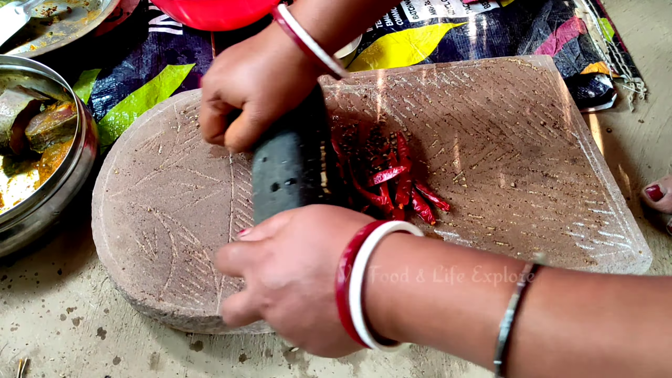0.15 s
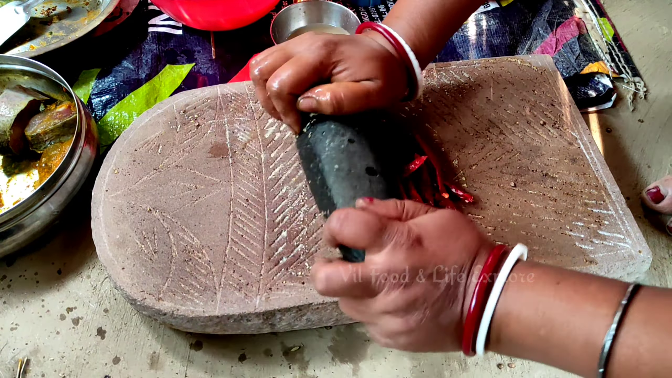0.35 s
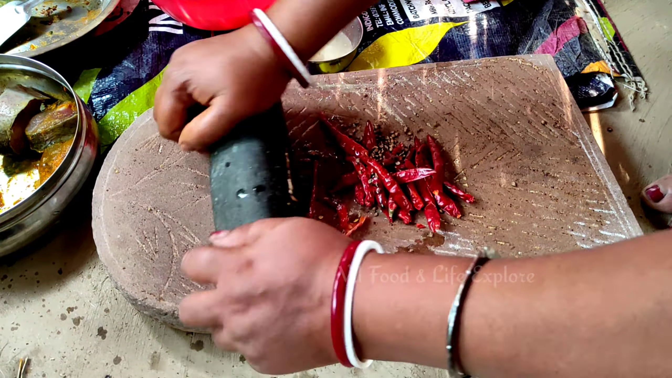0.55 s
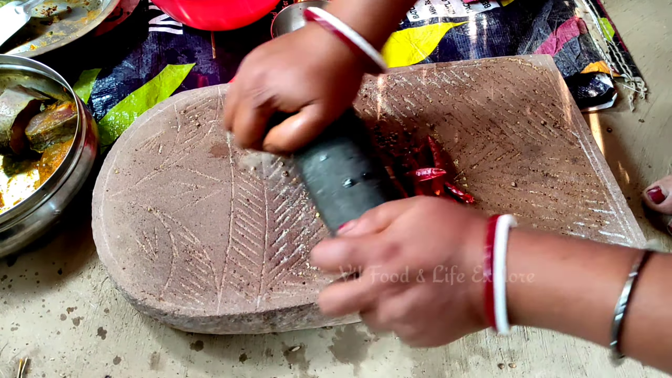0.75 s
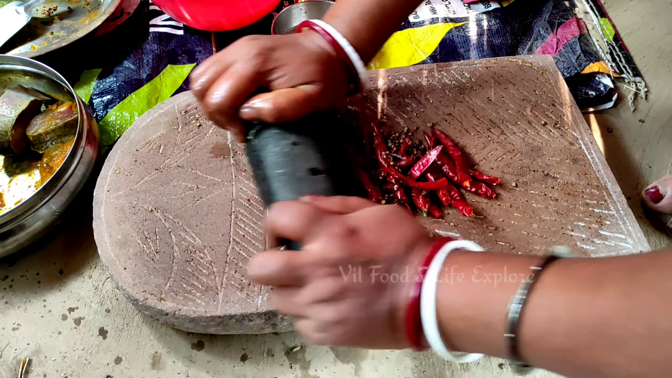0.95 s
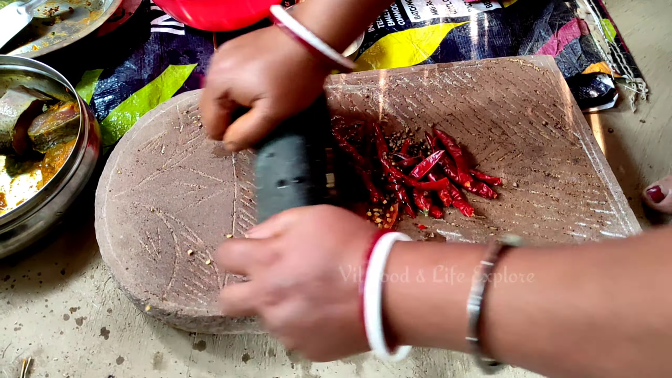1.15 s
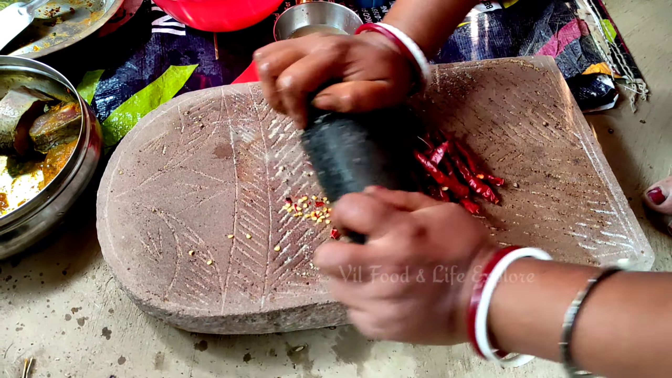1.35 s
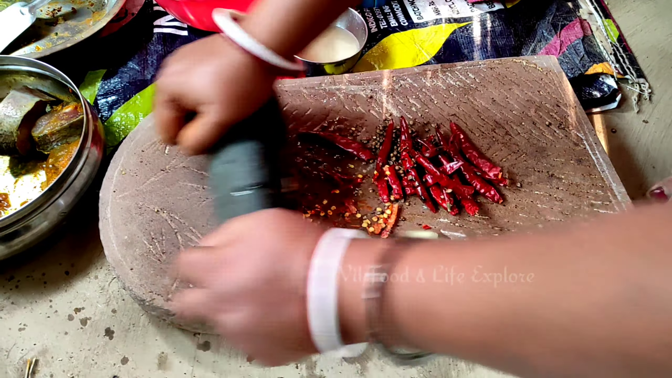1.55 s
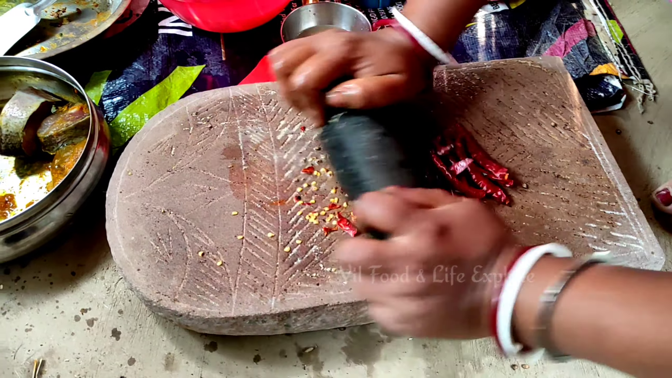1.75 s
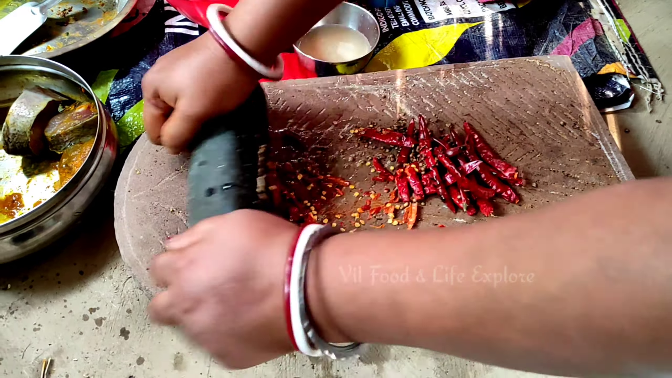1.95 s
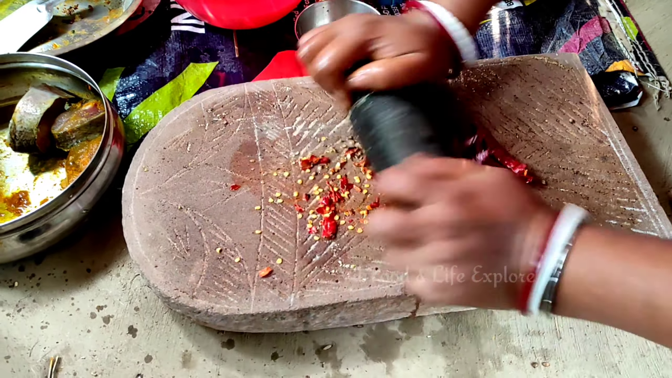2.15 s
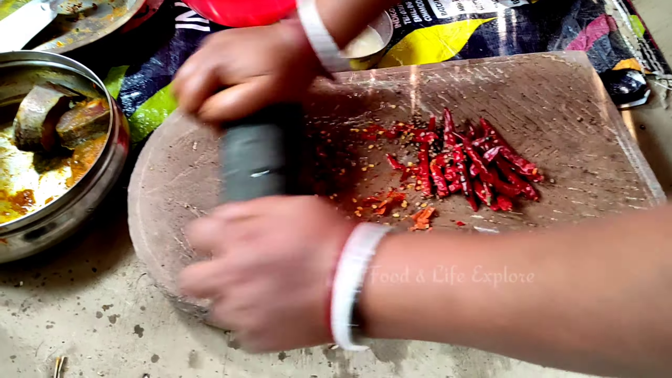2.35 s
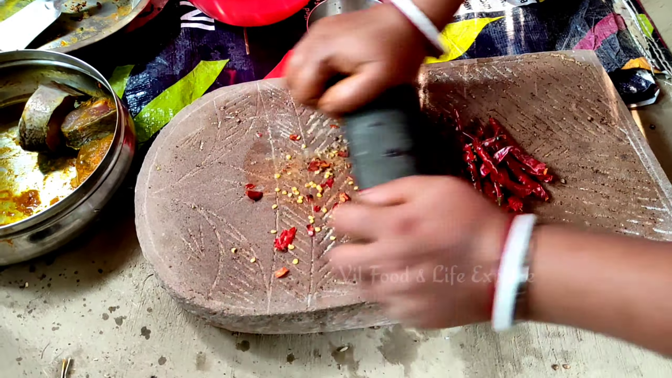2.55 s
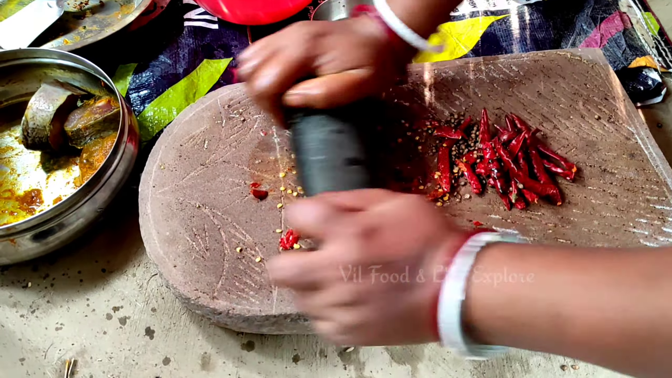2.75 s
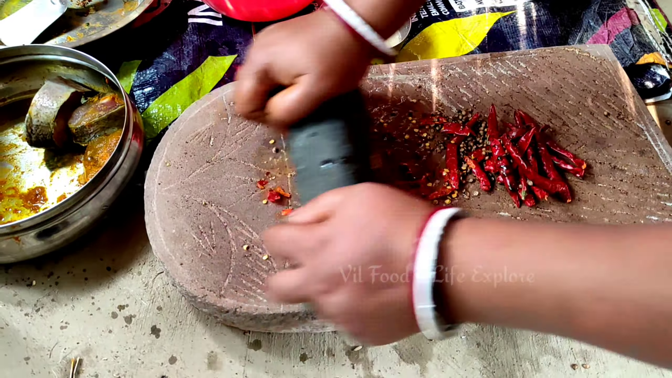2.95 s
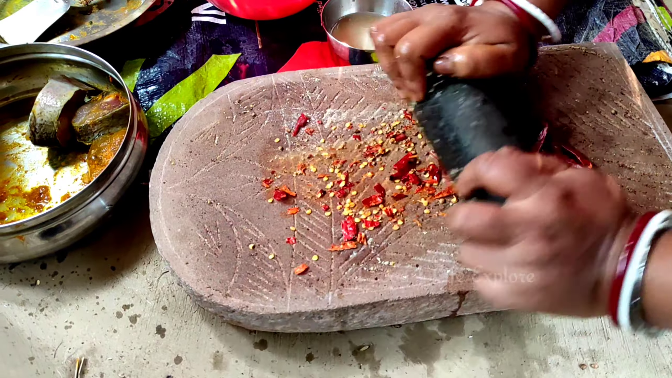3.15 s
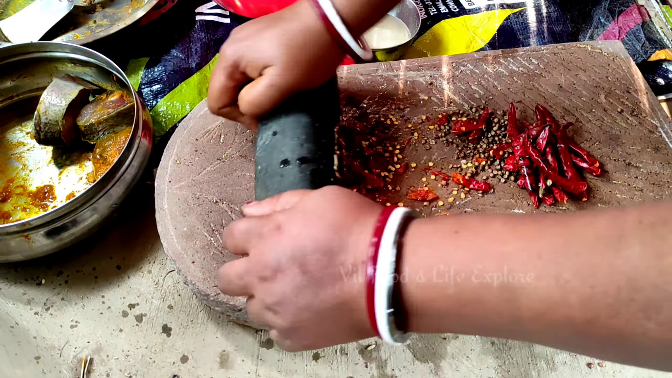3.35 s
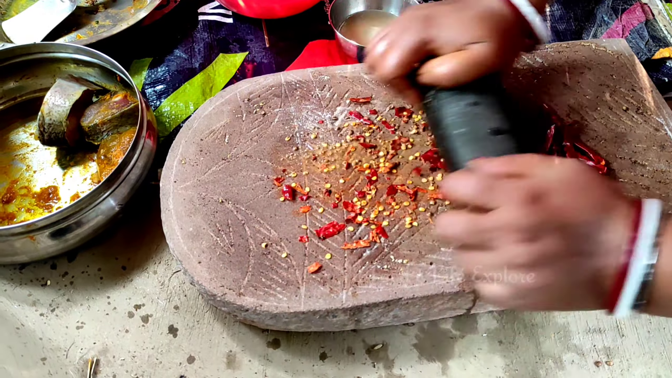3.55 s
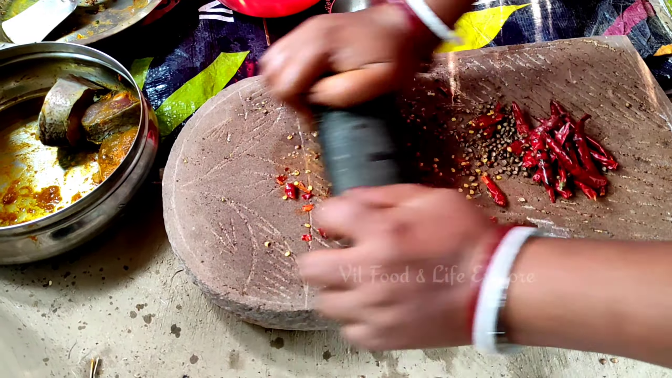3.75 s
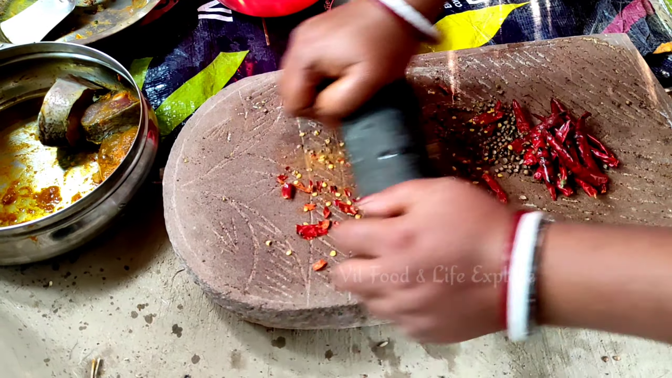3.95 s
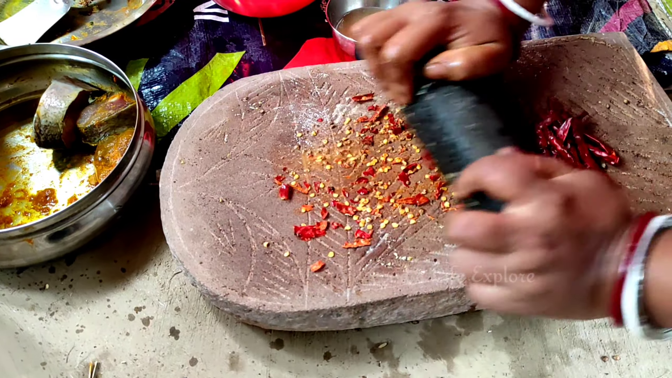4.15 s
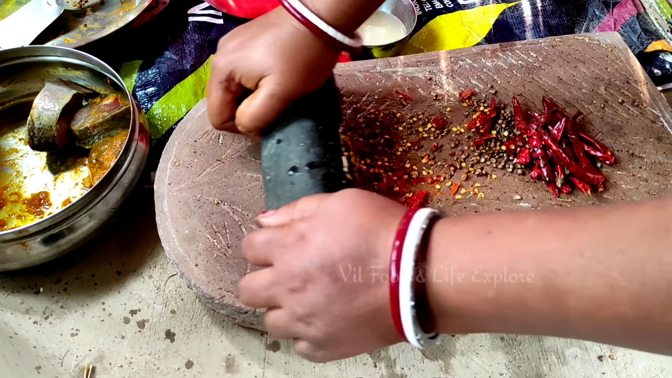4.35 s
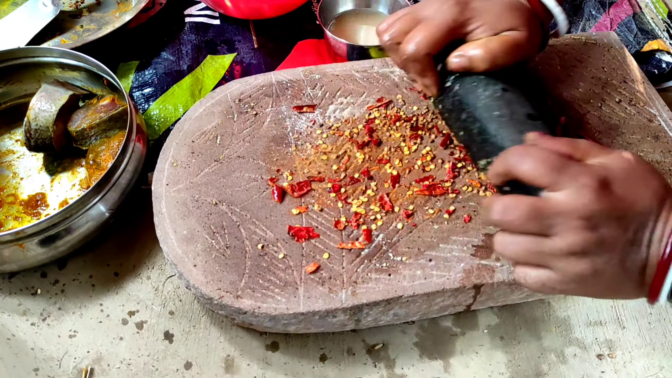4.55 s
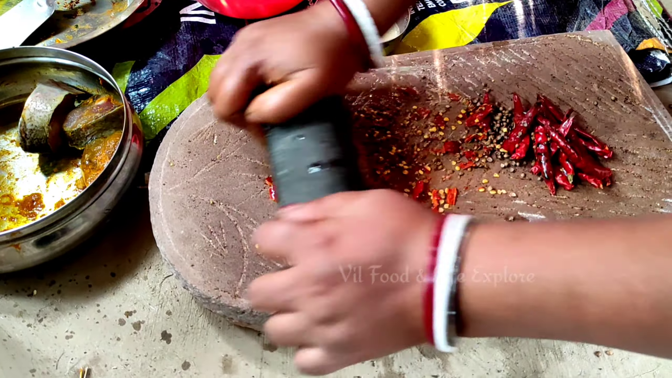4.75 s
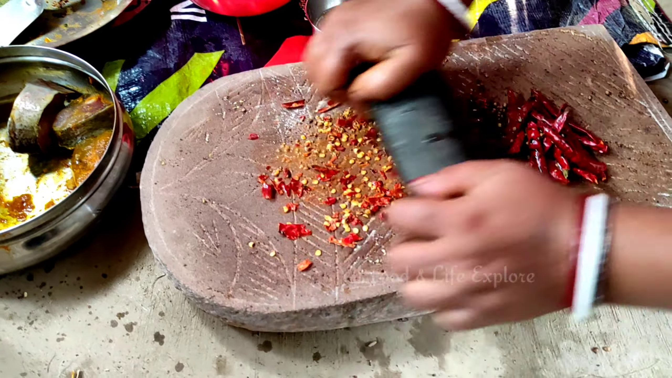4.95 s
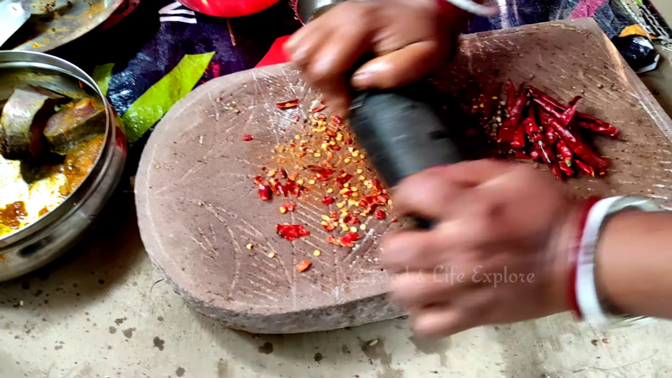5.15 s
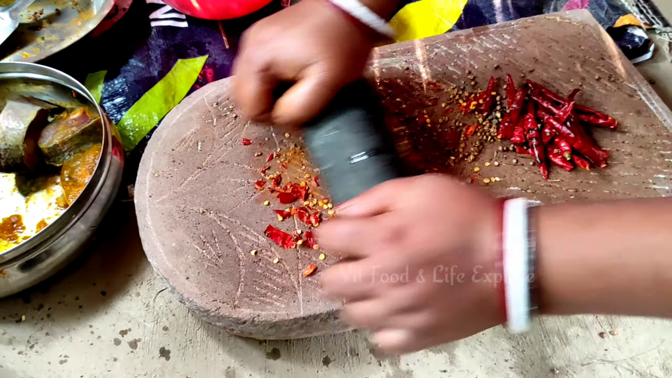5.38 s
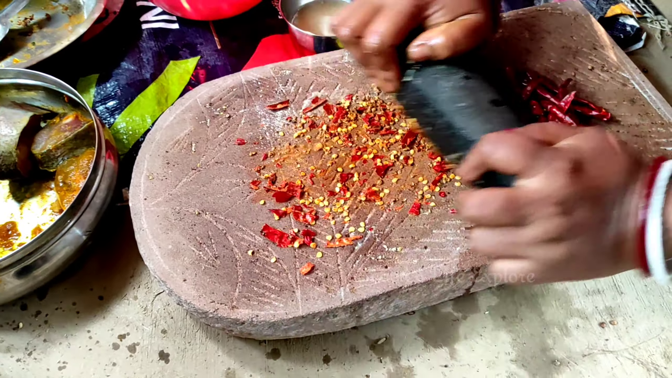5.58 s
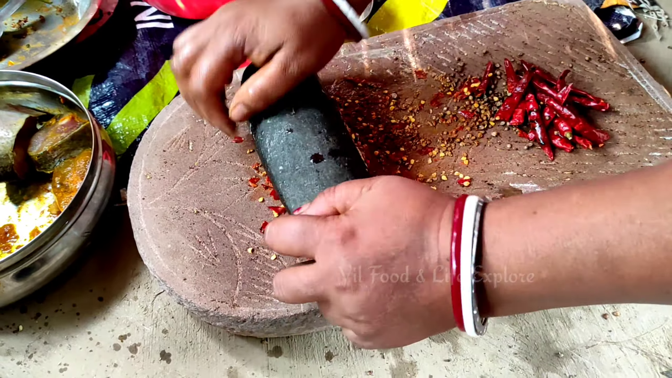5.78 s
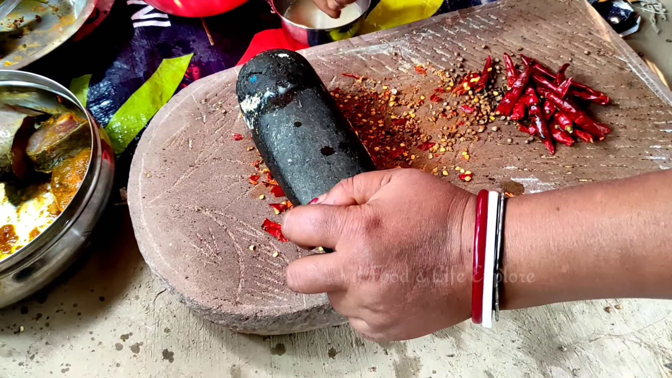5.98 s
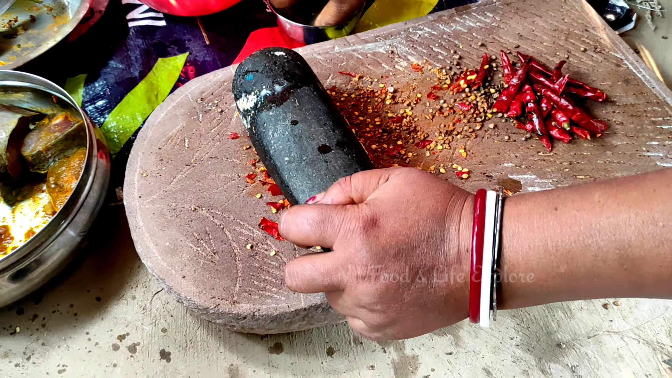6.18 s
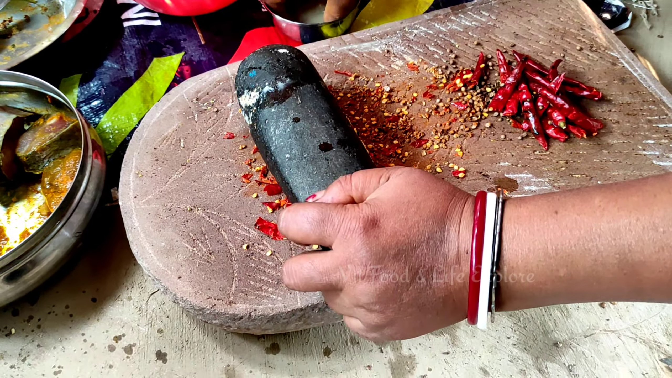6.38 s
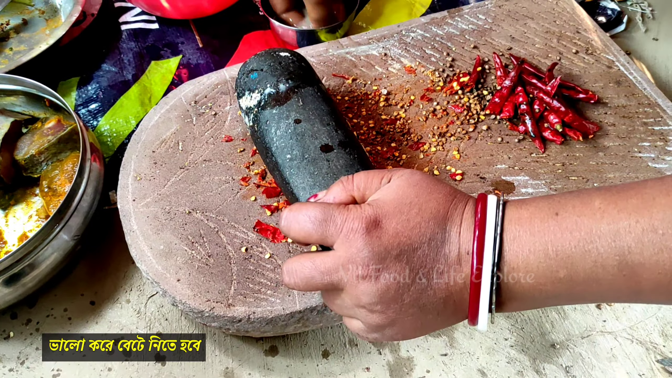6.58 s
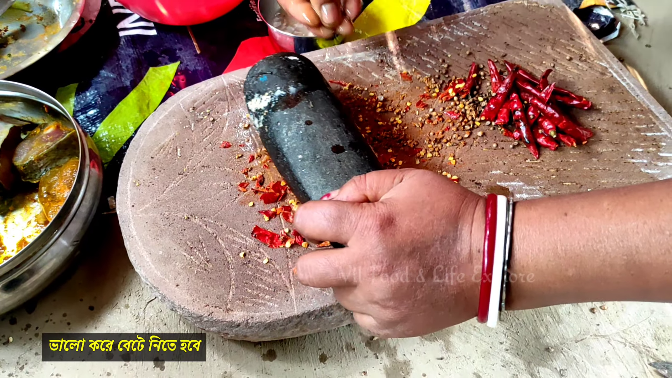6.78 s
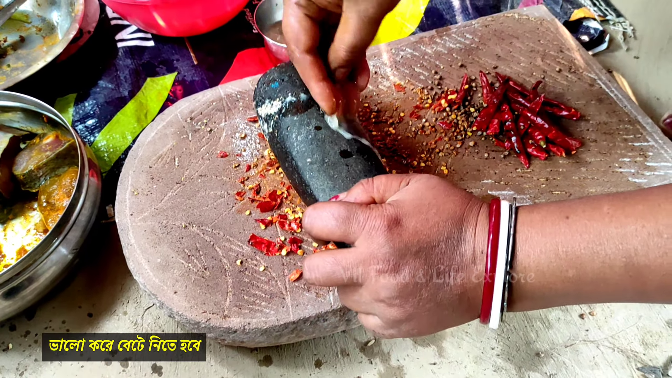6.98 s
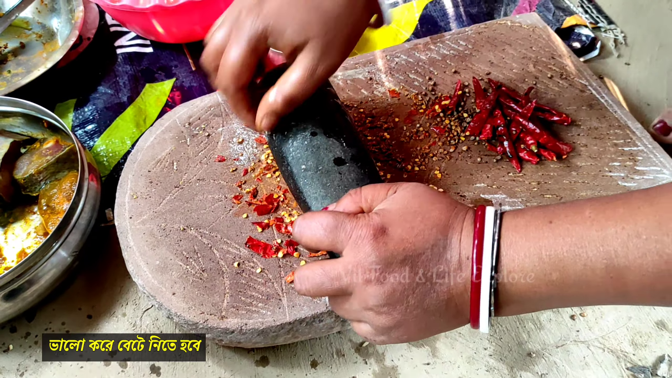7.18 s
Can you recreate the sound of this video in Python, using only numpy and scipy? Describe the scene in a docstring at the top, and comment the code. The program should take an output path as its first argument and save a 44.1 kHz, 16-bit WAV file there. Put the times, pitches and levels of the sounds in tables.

```python
"""In a quiet yard, close to a phone, dried chillies and spices are ground under a stone roller on a slab.
Light draws and heavy pushes alternate about twice a second: their pressure crunches husks and seeds, heard
as patchy banded noise, and rolling over grit makes the slab rumble and the roller sing. The roller drops off
pods, mostly early, and knocks as decaying stone modes. Bangles clink as brief contacts with damped modes,
then slide as a hand reaches for water. Far away, faint wavering partials whine."""
import sys
import numpy as np
from scipy import signal
from scipy.fft import rfft, irfft
from scipy.io import wavfile
from scipy.ndimage import map_coordinates

SR = 44100
rng = np.random.default_rng(int(sys.argv[2]) if len(sys.argv) > 2 else 0)


def unload_audio(sound):
    """Save the sound as a 16-bit wav file, at the path given as the first command line argument."""
    columns = np.transpose(np.atleast_2d(sound))
    # keep every value between -1 and 1, then stretch to whole-number steps
    steps = np.round(np.clip(columns, -1, 1) * 32767)
    wavfile.write(sys.argv[1], SR, steps.astype(np.int16))


N = 318402
TIME = np.arange(N) / SR


def undb(db):
    """Decibel law: level to amplitude gain."""
    return 10 ** (np.asarray(db) / 20)


def unit(x):
    """Power normalisation: scale to rms 1."""
    return x / np.sqrt(np.mean(x ** 2))


def power_sum(levels_db):
    """Incoherent addition: the powers of unrelated sounds add."""
    return 10 * np.log10(sum(10 ** (db / 10) for db in levels_db))


def follow(table):
    """Linear interpolation: the columns of a curve table at every sample."""
    s, *columns = np.transpose(table)
    return [np.interp(TIME, s, c) for c in columns]


def pan(db):
    """Level-difference stereo: gains for left minus right in dB."""
    return undb(np.array([[db], [-db]]) / 2)


def colour(x, points, size=4096):
    """Minimum-phase filtering: the cepstrum of (frequency [Hz], gain [dB]) points gives a causal response."""
    hz, db = np.transpose(points)
    bins = np.fft.rfftfreq(size, 1 / SR)
    gain = undb(np.interp(np.log(bins + 1), np.log(hz), db))
    cepstrum = irfft(np.log(gain))[:size // 2]
    cepstrum[1:] *= 2
    response = irfft(np.exp(rfft(cepstrum, size)))
    return signal.fftconvolve(np.atleast_2d(x), response[None], axes=1)[:, :x.shape[-1]]


def band(x, hz, width):
    """Simple resonator: one peak with gain 1 at its centre."""
    b, a = signal.iirpeak(min(hz, SR / 2 - 1000), hz / width, fs=SR)
    return signal.lfilter(b, a, x)


def steep_band(x, hz, width):
    """Cascaded resonators: the same peak twice falls off more steeply."""
    return band(band(x, hz, width), hz, width)


def walk(rate):
    """Random modulation: straight lines between normal draws, `rate` of them a second."""
    return np.interp(TIME * rate, np.arange(4096), rng.standard_normal(4096))


def grains(rate, spread_db, channels=2):
    """Impulsive noise: random tiny impacts, most of them small and a few large."""
    hit = rng.random(N) < rate / SR
    sizes = undb(spread_db * np.minimum(rng.exponential(size=N), 5))
    return hit * sizes * rng.standard_normal((channels, N)) / np.sqrt(rate)


def ring(modes, t, scatter_db, detune):
    """Modal superposition: decaying sines; each blow shares its force among them differently."""
    hz, db, t60 = np.transpose(modes)[:, :, None]
    force, shift = rng.standard_normal((2, len(modes), 1))
    sign = rng.choice([-1, 1], (len(modes), 1))
    decay = undb(db + scatter_db * force - 60 * t / t60)
    return np.sum(sign * decay * np.sin(2 * np.pi * hz * (1 + detune * shift) * t), axis=0)


def bounces(t, burst_s, gap_s, loss_db, count=4):
    """Inelastic rebound: one brief contact, then uneven and ever weaker ones."""
    starts = np.append(0, np.cumsum(gap_s * rng.uniform(.4, 1.6, count)))
    return sum(undb(-loss_db * k) * np.exp(-np.abs(t - s) / burst_s) * (t >= s)
               for k, s in enumerate(starts))


def add(out, s, sound, db):
    """Superposition: mix in a sound at time s; db is the peak of its channel mean."""
    start = int(s * SR)
    sound = np.atleast_2d(sound)[:, :N - start]
    out[:, start:start + sound.shape[1]] += sound * undb(db) / np.abs(sound.mean(axis=0)).max()


# treble resonance of each microphone port: (frequency [Hz], width [Hz], gain [dB])
PORT_RESONANCES = [(8850, 750, 17.5), (7480, 1480, 10.5)]


def ports(x):
    """Port resonance: treble reaches the two ports with unlike colour."""
    return np.array([side + undb(db) * band(side, hz, width)
                     for side, (hz, width, db) in zip(x, PORT_RESONANCES)])


# outdoor background spectrum: (frequency [Hz], gain [dB])
YARD_SPECTRUM = [(25, -2.5), (70, -2), (130, -8), (300, -19), (620, -17.5), (900, -14), (1400, -25),
                 (2400, -26), (4000, -32), (8000, -32), (12000, -43.5)]


def yard(level_db=-61):
    """Diffuse noise: partly common to both channels, its level wandering slowly."""
    noise = rng.standard_normal(N) + rng.standard_normal((2, N))
    return unit(colour(noise, YARD_SPECTRUM)) * undb(level_db + walk(2.05))


def wavering(table, partials):
    """Narrow-band noise: random quadrature amplitudes make each partial of a glide waver."""
    hz, db = follow(table)
    phase = 2 * np.pi * np.cumsum(hz) / SR
    lines = sum(undb(gain_db) * (walk(rate) * np.sin(k * phase) + walk(rate) * np.cos(k * phase))
                for k, gain_db, rate in partials)
    return lines * undb(db) * (TIME > table[0][0])


# glide of a faint far whine: (time [s], pitch [Hz], level before partial gains [dB])
WHINE_GLIDE = [(5.7, 1060, -63), (5.95, 1029, -57.5), (6.4, 1105, -57), (6.75, 1015, -57.5),
               (6.95, 927, -68), (7.22, 892, -76)]
# its partials: (multiple of the pitch [1], gain [dB], wavers [1/s])
WHINE_LINES = [(0.96, -8.5, 40), (1.01, -9, 60), (1.09, -11, 50), (2.17, -11.5, 260)]


def far_whine():
    """Inharmonic partials: close, fast-wavering lines make a rough rising and sinking whine."""
    return wavering(WHINE_GLIDE, WHINE_LINES)


# glide of a clearer far drone: (time [s], pitch [Hz], level before partial gains [dB])
DRONE_GLIDE = [(5.9, 577, -76), (6.25, 600, -78), (6.42, 601, -69), (6.7, 603, -71), (7.1, 602, -70),
               (7.22, 597, -69)]
# its partials: (multiple of the pitch [1], gain [dB], wavers [1/s])
DRONE_LINES = [(1, -3.5, 25)]


def far_drone():
    """Single partial: one line that wavers more slowly sounds clearer."""
    return wavering(DRONE_GLIDE, DRONE_LINES)


# glide of a thin far whistle: (time [s], pitch [Hz], level before partial gains [dB])
WHISTLE_GLIDE = [(5.9, 1660, -73), (6.15, 1690, -73), (6.45, 1792, -64), (6.75, 1775, -75),
                 (6.95, 1754, -93)]
# its partials: (multiple of the pitch [1], gain [dB], wavers [1/s])
WHISTLE_LINES = [(1, -2, 28)]


def far_whistle():
    """Single partial: one high wavering line sounds thin."""
    return wavering(WHISTLE_GLIDE, WHISTLE_LINES)


# glide of a short far tone: (time [s], pitch [Hz], rms level [dB])
TONE_GLIDE = [(7.0, 330, -78), (7.06, 338, -64.5), (7.15, 376, -67), (7.22, 368, -77)]


def far_tone():
    """Frequency modulation: a pure sine whose phase accumulates a mostly rising pitch."""
    hz, db = follow(TONE_GLIDE)
    sine = np.sqrt(2) * np.sin(2 * np.pi * np.cumsum(hz) / SR)
    return sine * undb(db) * (TIME > TONE_GLIDE[0][0])


def distance():
    """Superposition of all that is far: the yard and its faint tones."""
    return yard() + far_whine() + far_drone() + far_whistle() + far_tone()


# light taps of the reaching hand: (time [s], peak level [dB], pitch [Hz], t60 [s])
HAND_TAPS = [(7.001, -52, 1450, 0.021), (7.079, -37, 3020, 0.021)]


def taps(scuff_gain=0.89, scuff_s=0.0016, bright=2.1):
    """Single-mode impact: a tiny scuff and one short ring."""
    out, t = np.zeros((2, N)), np.arange(SR // 12) / SR
    for s, db, hz, t60 in HAND_TAPS:
        scuff = rng.standard_normal((2, len(t))) * np.exp(-t / scuff_s)
        touch = steep_band(scuff, bright * hz, 2 * hz)
        add(out, s, ring([(hz, 0, t60)], t, 0, 0) + scuff_gain * 2 * touch, db)
    return out


REST_S, SETTLE_S = 5.99, 0.025  # the roller comes to rest over the settling time before REST_S


def working():
    """Motion gate: 1 while the roller moves, falling to 0 as it comes to rest."""
    return np.clip((REST_S - TIME) / SETTLE_S, 0, 1)


SILENT_DB = -40  # depth from which an attack rises, or to which a stroke is released
SLIDE_ATTACK_S, SLIDE_FADE_DB_PER_S = 0.0088, 152
ARM_MOVING_DB = -63.5  # steady rub, before the stutter
# bangles slide along the arm: (time [s], length [s], relative level [dB], pitch [Hz], squeak re pitch [dB])
BANGLE_SLIDES = [(6.003, 0.017, -49.5, 8400, -8.5), (6.062, 0.13, -46, 7560, -35),
                 (6.685, 0.014, -48, 8350, -9.5)]


def sliding(stutter_db=3.0, rub_db=-8, width_hz=1000, squeak_hz=4600, level_db=0.5):
    """Friction noise: soft rubbing excites a narrow resonance for each slide over a lower squeak."""
    rub = colour(grains(5400, 0.83), [(1500, -8.5), (3200, -11.0), (5600, -12.5), (7500, -5.5),
                                      (9000, -16.0), (10500, -33), (15000, -43)])
    rub = unit(ports(rub))

    def narrow(hz):
        """Narrow-band noise: a resonance fed with white noise."""
        return unit(steep_band(rng.standard_normal((2, N)), hz, width_hz))

    out = rub * undb(ARM_MOVING_DB)
    for s, length, db, hz, squeak_db in BANGLE_SLIDES:
        attack_db = SILENT_DB * np.maximum(s - TIME, 0) / SLIDE_ATTACK_S
        fade_db = SLIDE_FADE_DB_PER_S * np.maximum(TIME - s - length, 0)
        slide = narrow(hz) + undb(squeak_db) * narrow(squeak_hz) + undb(rub_db) * rub
        out = out + slide * undb(db + attack_db - fade_db + level_db)
    return out * undb(stutter_db * walk(60)) * (1 - working())


# last clink as the arm stops: (time [s], peak level [dB], left minus right [dB])
FREE_CLINK = (5.848, -23, 12)
# modes of a bangle clear of the skin: (frequency [Hz], level [dB], t60 [s])
FREE_BANGLE_MODES = [(5854, -9, .15), (8964, -2, .13), (9589, -3, .18), (13072, -6, .13), (15328, -3, .11)]


def free_bangle():
    """Undamped modes: one bangle swings clear of the skin and rings on."""
    out, t = np.zeros((2, N)), np.arange(SR // 2) / SR
    s, db, pan_db = FREE_CLINK
    add(out, s, ring(FREE_BANGLE_MODES, t, 0, 0) * pan(pan_db), db)
    return out


# bangles strike each other: (time [s], peak level [dB], left minus right [dB])
BANGLE_CLINKS = [(0.644, -20, 0), (0.657, -28.5, 9), (1.1299, -16, 2), (1.902, -25.5, -3),
                 (2.018, -18.5, 3.5), (2.053, -17.5, 4), (2.121, -23, -2), (2.493, -19, 6),
                 (2.502, -23, -2), (2.95, -20, 2), (2.963, -14.5, 1), (3.415, -21.5, 8), (3.445, -16, 1.5),
                 (3.9305, -14.5, 4), (4.391, -19, 7), (4.402, -21, 6), (4.425, -23, 2), (4.865, -19, 15),
                 (4.8768, -17, 0.5), (5.355, -13.5, 5), (5.372, -20, 6.5), (5.378, -11, -3),
                 (5.8255, -15, 6), (5.846, -14.5, 4), (5.897, -22, -1), (6.216, -29.5, 1)]
# modes of bangles on the arm: (mean frequency [Hz], mean level [dB], t60 [s])
WORN_BANGLE_MODES = [(2010, -13.5, 0.1), (3170, -20.5, 0.16), (5645, -2.5, 0.053), (7020, 10.5, 0.048),
                     (8470, 20, 0.006), (8745, 18.5, 0.014), (10920, 3, 0.062), (16000, -7, .035)]


def bangles(tick=14, tick_s=0.0003, chatter=0.14, chatter_s=0.015, gap_s=0.0051, loss_db=10, rise_s=0.00078):
    """Damped modes: hard rings click and rebound; the skin damps them at once, so each contact is dry."""
    out, t = np.zeros((2, N)), np.arange(SR // 8) / SR
    for s, db, pan_db in BANGLE_CLINKS:
        stray = [(hz, -1, .03) for hz in rng.uniform(5500, 15500, 9)]
        envelope = bounces(t, tick_s, gap_s, loss_db) + chatter * np.exp(-t / chatter_s)
        contact = rng.standard_normal((2, len(t))) * envelope
        click = colour(contact, [(1000, -16.0), (4500, -10), (7000, 8.5), (9200, 15),
                                 (10500, -8.5), (15000, -7)])
        tone = np.array([ring(WORN_BANGLE_MODES + stray, t, 5, .04) for side in range(2)])
        onset = np.minimum(t / rise_s, 1)
        add(out, s, (tone + tick * click) * onset * pan(pan_db), db)
    return out


SLAB_LAG_S = 0.0035  # lag of a 1 kHz bending wave; half of it is taken off at every frequency


def bending(x):
    """Dispersion: the slab carries high notes faster than low ones, so every blow chirps downward."""
    size = 2 * len(x)
    khz = np.fft.rfftfreq(size, 1 / SR) / 1000
    # the slope of this phase is a lag falling with the root of frequency
    turns = 1000 * SLAB_LAG_S * (2 * np.sqrt(khz) - khz / 2)
    return irfft(rfft(x, size) * np.exp(-2j * np.pi * turns))[:len(x)]


# modes of roller and slab: (mean frequency [Hz], level before focus and scatter [dB], t60 [s])
ROLLER_SLAB_MODES = [(488, -22, 0.037), (647, -9.5, 0.025), (713.4, -5, 0.12), (946, 9, 0.06),
                     (1034, 11, 0.066), (1490, 1, 0.043), (1706, -4, 0.17), (1856, -4, 0.12),
                     (2250, 1, 0.057), (2720, 8.5, 0.033)]


def clack(t, pitch_hz, upper_db, thud_db, focus_db=12, rise_s=0.0015, crumble=0.08, thud_s=0.005):
    """Modal excitation: a short thud, then a clean ring; the place excited decides which modes speak."""
    modes = []
    for hz, db, t60 in ROLLER_SLAB_MODES:
        away = min(abs(np.log2(hz / pitch_hz)) * 3, 1)  # full loss a third of an octave off
        modes.append((hz, db - focus_db * away + upper_db * (hz > 1400), t60))
    tone = ring(modes, t, 2, .005) * (1 - np.exp(-t / rise_s))
    push = crumble * rng.standard_normal(len(t)) * np.exp(-t / thud_s)
    push[0] += 1
    thud = colour(push, [(100, -14), (300, -9.5), (550, -1.5), (1200, -0.5), (1800, upper_db - 7.5),
                         (2750, upper_db - 9.5), (3300, -38), (8000, -38)])[0]
    return bending(unit(tone) + undb(thud_db) * unit(thud))


# the roller scuffs and rattles: (time [s], peak before panning [dB], pitch that rings most [Hz], fade [s])
ROLLER_SCUFFS = [(0.044, -42, 473, 0.019), (0.187, -33.5, 900, 0.061), (0.612, -40.5, 730, 0.025),
                 (0.722, -34.5, 566, 0.071), (1.595, -38, 730, 0.013), (1.675, -32.5, 730, 0.02)]


def scuffs(rate=700, upper_db=-14, thud_db=1, swell=0.22):
    """Repeated impact: the loose roller skips over the slab in a fading run of tiny contacts."""
    out, t = np.zeros((2, N)), np.arange(SR // 5) / SR
    for s, db, pitch_hz, fade_s in ROLLER_SCUFFS:
        contacts = (rng.random(len(t)) < rate / SR) * rng.uniform(-1.3, 1, len(t))
        contacts = contacts * np.exp(-t / fade_s) * np.minimum(t / (swell * fade_s), 1)
        run = signal.fftconvolve(contacts, clack(t, pitch_hz, upper_db, thud_db))[:len(t)]
        add(out, s, run, db)
    return out * pan(5.0)


# the roller knocks on the slab; the row at 3.329 s is a swell of its ring during a push:
# (time [s], relative peak [dB], pitch that rings most [Hz], upper modes [dB], thud re ring [dB])
STONE_RINGS = [(0.562, -15, 930, -3, -7), (0.593, -24, 950, -12, 3), (0.603, -31, 950, -4, 14),
               (1.130, -17, 720, -13, 3.5), (1.2325, -13.5, 950, -1, -9), (1.272, -15, 930, 3.5, -8.5),
               (1.5875, -14.5, 724, 3, 6.5), (1.647, -25, 940, -9, -0.5), (1.691, -28, 940, -21, 8),
               (2.035, -15.5, 730, -3, -2.5), (2.208, -23, 950, -1, -12.5), (2.221, -19, 940, -1, -8.5),
               (2.477, -29, 730, -22, 2), (2.608, -31, 950, -20, 1), (2.849, -27.5, 950, -18, -5),
               (3.230, -25.5, 950, -4, -9), (3.329, -28, 930, -23, -16), (4.185, -36.5, 960, -9, -9)]


def knocks_and_swell(level_db=1, turn_hz=1300, turn_width_hz=130):
    """Modal ringing: the roller knocks as pods give way, and once its ring swells; the left port lags."""
    out, t = np.zeros((2, N)), np.arange(SR // 5) / SR
    for s, db, pitch_hz, upper_db, thud_db in STONE_RINGS:
        add(out, s, clack(t, pitch_hz, upper_db, thud_db), db + level_db)
    out[0] -= 2 * band(out[0], turn_hz, turn_width_hz)  # all-pass: delays without changing level
    return out * pan(2.9)


# whole pods creak: (time [s], length [s], level [dB], first pitch [Hz], last pitch [Hz])
POD_CREAKS = [(1.291, 0.059, -37.5, 2307, 2730), (3.181, 0.05, -36, 3290, 1950)]


def creaks(width_hz=700, stutter_db=3):
    """Stick-slip: a dry pod sticks and slips under the roller; its resonance glides as it flattens."""
    out = np.zeros((2, N))
    lowpass = signal.butter(2, width_hz / 2, fs=SR, output="sos")
    rasp = signal.sosfilt(lowpass, rng.standard_normal((2, N)) + rng.standard_normal(N))
    rasp = unit(rasp * undb(stutter_db * walk(200)))
    for s, length, db, first_hz, last_hz in POD_CREAKS:
        way = np.clip((TIME - s) / length, 0, 1)
        phase = 2 * np.pi * np.cumsum(first_hz + (last_hz - first_hz) * way) / SR
        carrier = np.sqrt(2) * np.sin(phase)
        out += undb(db) * np.sin(np.pi * way) * carrier * rasp
    return out


# single seeds and pods snap: (time [s], peak level [dB], pitch [Hz])
SEED_SNAPS = [(0.475, -19.5, 7240), (1.011, -29, 8400), (1.3238, -24, 2600), (1.4502, -18, 7100),
              (2.7924, -16.5, 7360), (3.308, -21, 7500), (3.661, -21, 7200), (3.784, -17, 6900),
              (4.2677, -12, 7040), (4.7094, -20, 7600), (4.747, -14.5, 7000), (4.783, -21, 7240),
              (5.2011, -15.5, 7700), (5.2206, -16.5, 7200), (5.674, -19.5, 7200), (5.7472, -24, 7800)]


def snaps(crack_s=0.0013, crumb_gap_s=0.0022, crumb_loss_db=7, breadth=0.6, pan_db=-3):
    """Brittle fracture: a seed bursts with one crack and a few smaller ones as it crumbles."""
    out, t = np.zeros((2, N)), np.arange(SR // 16) / SR
    for s, db, hz in SEED_SNAPS:
        burst = rng.choice([-1, 1], (2, len(t))) * bounces(t, crack_s, crumb_gap_s, crumb_loss_db)
        add(out, s, steep_band(burst, hz, breadth * hz) * pan(pan_db), db)
    return out


def pressure(s, length, hardest, shape):
    """Force envelope of one stroke [dB]: the roller bites, bears down to its hardest point and lets go."""
    attack_s, bite_db, sag_db, release_s = shape
    times = [s - attack_s, s, s + length * hardest, s + length, s + length + release_s]
    levels_db = [SILENT_DB, -bite_db, 0, -sag_db, SILENT_DB]
    return np.interp(TIME, times, levels_db, left=-np.inf, right=-np.inf)


# light strokes draw spice from the heap: (time [s], length [s], hardest point as share of length [1],
# relative fine crunch [dB], relative coarse crunch [dB], relative rumble [dB])
LIGHT_DRAWS = [(0.0, 0.18, 0.5, -49.5, -56, -77), (0.29, 0.14, 1, -35.5, -43.5, -86),
               (0.762, 0.19, 0.9, -36, -46, -59.5), (1.231, 0.15, 0.52, -36, -44, -57.5),
               (1.701, 0.12, 0.61, -33.5, -43.5, -54.5), (2.143, 0.16, 0.44, -35.5, -48.5, -53),
               (2.604, 0.17, 0.36, -34.5, -49, -54), (3.036, 0.24, 0.36, -34.5, -51, -52),
               (3.58, 0.14, 0.63, -32, -46.5, -52.5), (4.059, 0.13, 0.39, -34, -50, -47.5),
               (4.525, 0.22, 0.33, -33, -51.5, -52.5), (5.01, 0.16, 0.61, -33, -51, -50.5),
               (5.505, 0.14, 0.71, -28.5, -50, -51)]
# heavy strokes push back over it and crush it: the same columns (time [s], length [s],
# hardest point [1], relative fine crunch [dB], relative coarse crunch [dB], relative rumble [dB])
HEAVY_PUSHES = [(0.449, 0.14, 0.083, -28, -41.5, -60), (0.982, 0.11, 0.26, -28.5, -43.5, -50.5),
                (1.424, 0.2, 0.37, -27, -42.5, -48.5), (1.875, 0.16, 0.45, -28, -43, -47.5),
                (2.334, 0.18, 0.34, -28.5, -43.5, -47.5), (2.79, 0.16, 0.023, -24.5, -43, -46),
                (3.292, 0.14, 0.45, -21, -41, -49), (3.748, 0.18, 0.47, -25.5, -43, -48.5),
                (4.236, 0.17, 0.31, -23.5, -42.5, -49), (4.73, 0.14, 0.34, -21.5, -43.5, -49.5),
                (5.196, 0.18, 0.55, -25.5, -46, -48), (5.681, 0.18, 0.38, -25.5, -48, -52)]
# pressure of one draw: (attack [s], first bite below the peak [dB], sag by the end [dB], release [s])
DRAW_PRESSURE = (0.087, 6.9, 2.36, 0.082)
# pressure of one push: (attack [s], first bite below the peak [dB], sag by the end [dB], release [s])
PUSH_PRESSURE = (0.031, 4.46, 14.4, 0.093)
# between strokes the roller only leans on the spice: relative levels
LEAN_FINE_DB, LEAN_COARSE_DB, LEAN_RUMBLE_DB = -65, -71.5, -71


def crushing():
    """Fracture under load: relative levels [dB] of fine and coarse crunch follow the strokes' pressure."""
    fine, coarse = [LEAN_FINE_DB], [LEAN_COARSE_DB]
    for strokes, shape in [(LIGHT_DRAWS, DRAW_PRESSURE), (HEAVY_PUSHES, PUSH_PRESSURE)]:
        for s, length, hardest, fine_db, coarse_db, _ in strokes:
            press_db = pressure(s, length, hardest, shape)
            fine.append(fine_db + press_db)
            coarse.append(coarse_db + press_db)
    return power_sum(fine), power_sum(coarse)


# rolling before the bite and after the crush of a draw: (lead [s], run-on [s])
DRAW_ROLLING = (0.049, 0.008)
# rolling before the bite and after the crush of a push: (lead [s], run-on [s])
PUSH_ROLLING = (0.014, 0.048)
RUMBLE_ARCH = 0.64  # exponent: the higher, the more the rumble gathers in mid-stroke


def travel():
    """Speed dependence: the relative rumble level [dB] follows the roller's speed, one arch a stroke."""
    power = np.full(N, undb(LEAN_RUMBLE_DB) ** 2)
    for strokes, (lead_s, run_on_s) in [(LIGHT_DRAWS, DRAW_ROLLING), (HEAVY_PUSHES, PUSH_ROLLING)]:
        for s, length, *_, rumble_db in strokes:
            way = (TIME - s + lead_s) / (lead_s + length + run_on_s)
            moving = (way > 0) & (way < 1)
            speed = np.sin(np.pi * way[moving]) ** RUMBLE_ARCH
            power[moving] += (undb(rumble_db) * speed) ** 2
    return 10 * np.log10(power)


# rumble spectrum of the slab: (frequency [Hz], gain [dB])
RUMBLE_SPECTRUM = [(30, -76), (60, -4.5), (95, -2.5), (118, 6), (142, -5), (185, 5), (250, -4.5),
                   (340, -10), (500, -12.5), (900, -42.5)]
# singing spectrum of the roller: (frequency [Hz], gain [dB])
GRATING_SPECTRUM = [(500, -32), (780, -63.5), (870, -8.5), (935, 7), (1020, -5.5), (1150, -9.5),
                    (1400, -16.5), (2200, -50)]


def rolling(low_db, powder_db, rumble_db=3.0, ring_db=-15.0, pods_db=-6, bumps=900, apart=0.18):
    """Roughness excitation: pitted faces bump over grit; the slab rumbles, the roller sings when crushing."""
    cushion_db = pods_db * np.clip(1 - TIME / 3, 0, 1)  # whole pods muffle the first strokes
    rumble_bumps = grains(bumps, 1.9, channels=1) + apart * grains(bumps, 3.9)
    rumble = unit(colour(rumble_bumps, RUMBLE_SPECTRUM))
    grate_bumps = grains(bumps, 5.4, channels=1) + grains(bumps, 4.43)
    grate = unit(colour(grate_bumps, GRATING_SPECTRUM))
    grate[0] = np.roll(grate[0], 7)  # later on the left, in samples
    both = rumble * undb(low_db + rumble_db) + grate * undb(powder_db + cushion_db + ring_db)
    return both * pan(4.9) * working()


def patchy_clicks(rate, patchy_db, flicker_rate, count=40):
    """Banded noise: random clicks in many narrow bands, each flickering on its own, make a patchy crunch."""
    out = np.zeros((2, N))
    share = np.linspace(0, 1, count + 1)
    edges = np.geomspace(500, 16500, count + 1) + share * np.linspace(3000, 0, count + 1)
    for low, high in zip(edges, edges[1:]):
        flicker = undb(patchy_db * walk(flicker_rate))
        for side in out:
            when, sign = rng.random((int(rate * N / SR), 2)).T
            clicks = np.bincount((when * N).astype(int), np.sign(sign - .5), N)
            side += steep_band(clicks * flicker, (low + high) / 2, high - low)
    return out


def grit(rate=120, spread_db=1.2, crack_s=0.0007, stone_share=0.4):
    """Broadband fracture: hard seeds and flakes crack singly over the whole treble; sizes saturate."""
    t = np.arange(SR // 200) / SR
    impacts = grains(rate, spread_db, channels=1)[0]
    sizes = np.tanh(np.abs(impacts) * np.sqrt(rate) / 2)
    cracks = signal.fftconvolve(sizes, np.exp(-t / crack_s))[:N]
    return unit(cracks * (rng.standard_normal((2, N)) + stone_share * rng.standard_normal(N)))


# near reflections: (delay at the start of a draw [s], delay at the start of a push [s], gain [1])
NEAR_REFLECTIONS = [(0.00016, 0.000028, 0.028), (0.0011, 0.001406, 0.21)]


def reflected(x):
    """Comb filtering: slab and hands throw sound back over changing paths; its colour sweeps each stroke."""
    turns = sorted([(row[0], 0) for row in LIGHT_DRAWS] + [(row[0], 1) for row in HEAVY_PUSHES])
    place, = follow(turns)
    out = x
    for first_s, last_s, gain in NEAR_REFLECTIONS:
        late = (TIME - first_s - (last_s - first_s) * place) * SR  # sample positions to read
        out = out + gain * np.array([map_coordinates(side, [late], order=3) for side in x])
    return unit(out)


# spectrum of husks breaking to powder: (frequency [Hz], gain [dB])
HUSK_SPECTRUM = [(1500, -33), (3000, -17), (4400, -10.5), (6000, -6.5), (7400, -2.5), (9000, -12),
                 (10000, -16.5), (11000, -16), (12200, -19), (15500, -22)]
# spectrum of coarse pieces: (frequency [Hz], gain [dB])
PIECE_SPECTRUM = [(250, -9), (500, -4), (1300, -1), (1750, 1.5), (2650, 8.5), (3600, -1), (5000, -10.5),
                  (8000, -56.5)]


def crunch(powder_db, pieces_db, catch_db=1.0, fine_db=-1, coarse_db=1,
           crackle=0.67, grit_share=0.45, shared=0.37):
    """Fracture noise: husks break to powder and coarse pieces while the roller catches and slips on them."""
    breaks = unit(patchy_clicks(rate=130, patchy_db=3.5, flicker_rate=45))
    breaks = breaks + crackle * unit(grains(1800, 0.19)) + grit_share * grit()
    breaks = reflected(breaks)
    fine = unit(ports(colour(breaks, HUSK_SPECTRUM))) * undb(powder_db + fine_db) * pan(-0.58)
    coarse = unit(colour(breaks + shared * breaks.mean(axis=0), PIECE_SPECTRUM))
    coarse = coarse * undb(pieces_db + coarse_db)
    return (fine + coarse) * undb(catch_db * walk(90)) * working()


def room(x, wet_db=-17, t60=0.2):
    """Reverberation: weak short reflections from floor and walls as exponentially decaying noise."""
    t = np.arange(SR // 3) / SR
    tail = rng.standard_normal((2, len(t))) * np.exp(-np.log(1000) * t / t60) * (t > .004)
    tail /= np.sqrt(np.sum(tail ** 2, axis=1, keepdims=True))
    return x + undb(wet_db) * signal.fftconvolve(x, tail, axes=1)[:, :N]


def scene():
    """Arrival-time difference: the stones reach the left port a little later than the right."""
    powder_db, pieces_db = crushing()
    stones = rolling(travel(), powder_db) + knocks_and_swell() + scuffs()
    stones[0] = np.roll(stones[0], 4)  # samples
    hand = taps() + sliding() + free_bangle() + bangles()
    spice = creaks() + snaps() + crunch(powder_db, pieces_db)
    return distance() + room(hand + stones + spice)


def record(dry, top_hz=15700):
    """Band limitation: the phone cuts the top with a steep elliptic low-pass."""
    return signal.sosfilt(signal.ellip(8, .2, 70, top_hz, fs=SR, output="sos"), dry)


dry = scene()
out = record(dry)
unload_audio(out)
```